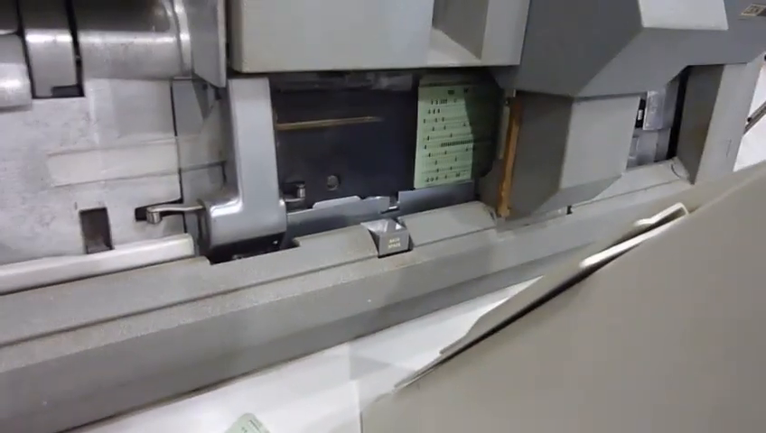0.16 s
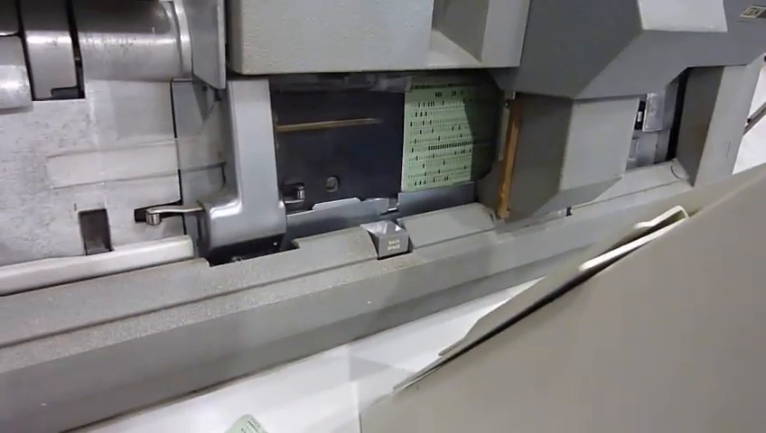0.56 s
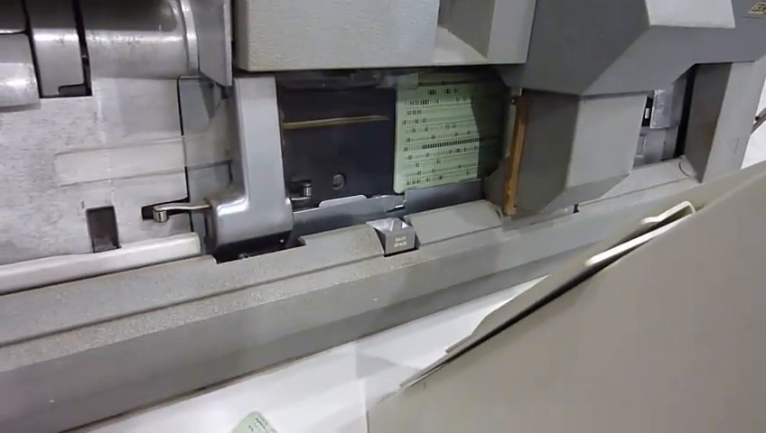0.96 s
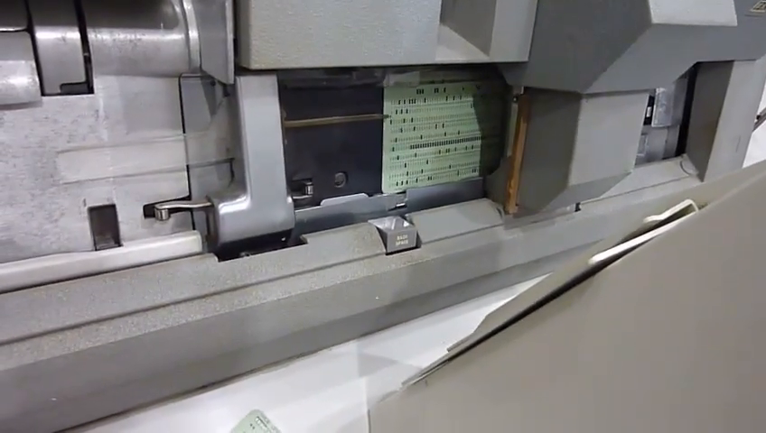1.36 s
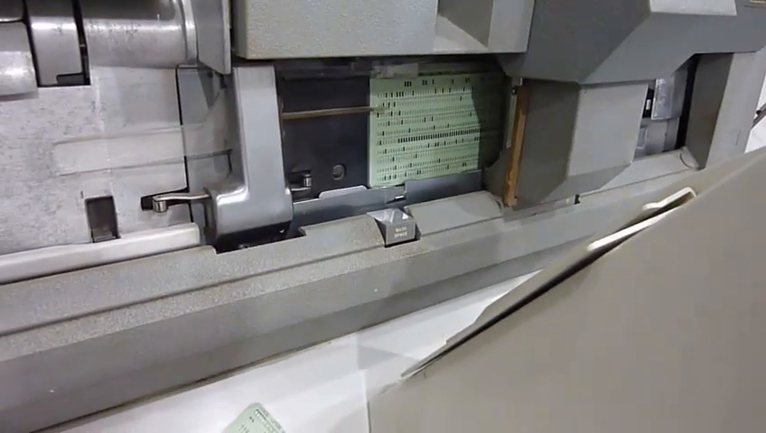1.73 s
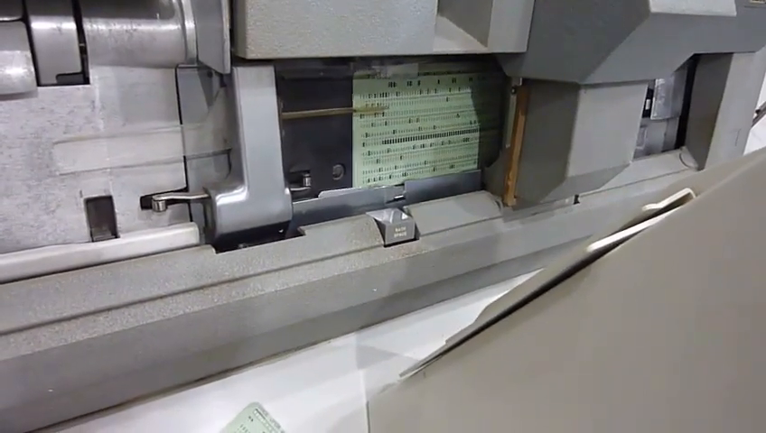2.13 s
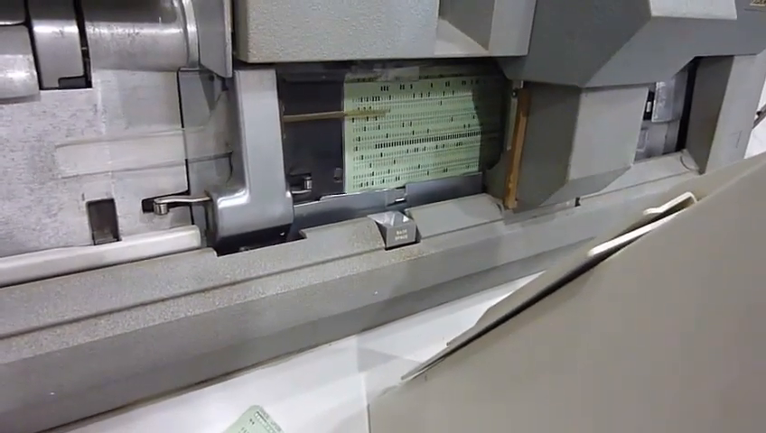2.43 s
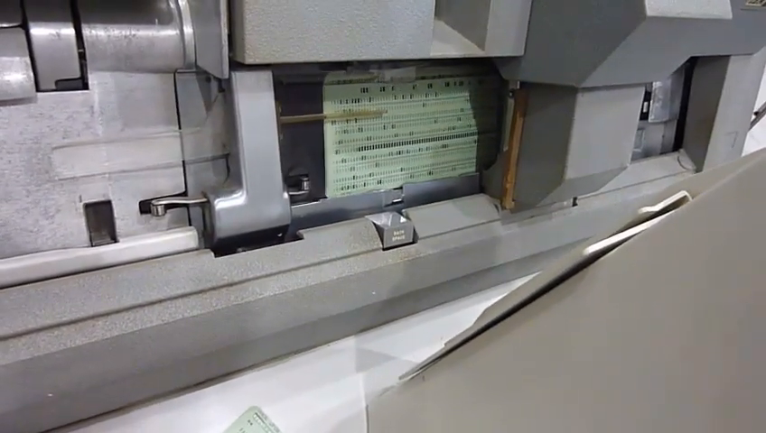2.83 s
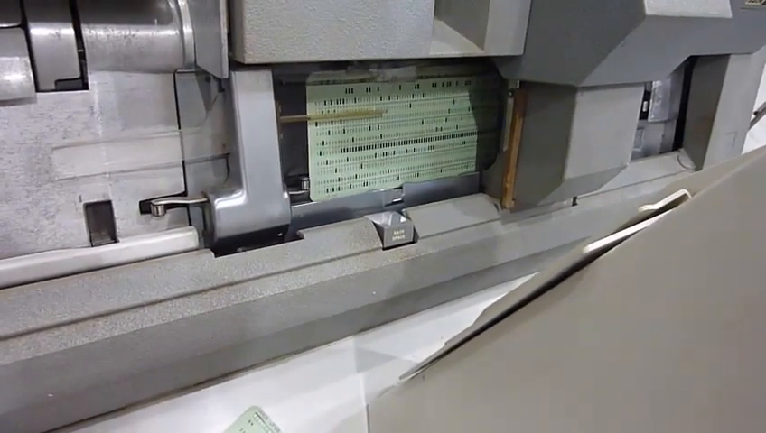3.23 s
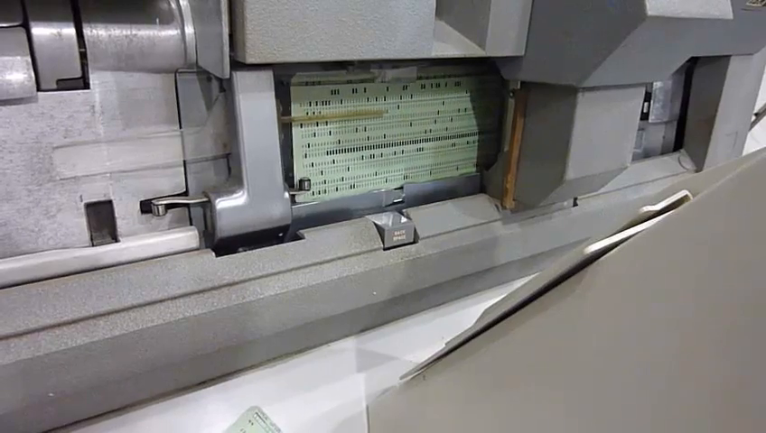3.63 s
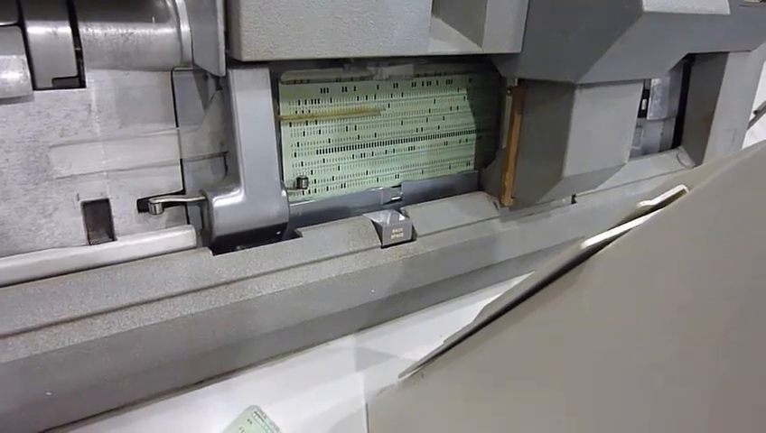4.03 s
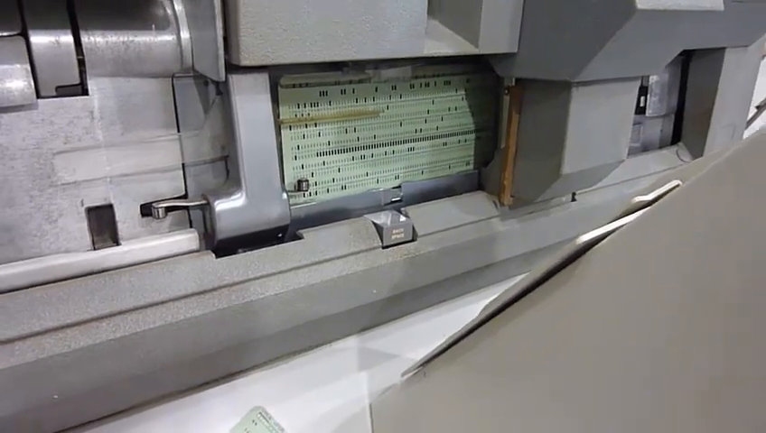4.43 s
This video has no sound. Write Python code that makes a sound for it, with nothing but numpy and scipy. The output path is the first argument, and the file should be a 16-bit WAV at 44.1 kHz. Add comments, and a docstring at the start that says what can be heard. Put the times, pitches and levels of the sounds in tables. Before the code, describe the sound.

A card punch is already running at the start, hammering about thirteen times a second with bright steel clacks, looser return clicks and a dense rattle. Just before four seconds it latches with a quick bouncing clack. The hard room rings out briefly and a soft motor whirr remains, with a faint belt whine and one small late tick. Close stereo pickup, slightly left, with limited treble.

```python
"""A keypunch, already running, duplicates a card at almost 13 columns a second. Each turn of its cam shaft trips
the interposers, drives the punches through the card, lets the linkage fall back and steps the card on with an
escapement: noise bursts through resonances, with decaying sines for levers and frame, over a noise rattle.
The clutch then latches, the hard room rings out as decaying noise, and the motor, heard throughout as
shaped noise and wavering sines, idles on: a belt whines once, the whirr grows a little and one late tick sounds."""
import sys
import numpy as np
from scipy import signal
from scipy.fft import rfft, irfft, next_fast_len
from scipy.io import wavfile
from scipy.ndimage import map_coordinates

SR = 44100
rng = np.random.default_rng(int(sys.argv[2]) if len(sys.argv) > 2 else 0)


def log_audio(samples):
    """Write samples as a 16-bit WAV file to the path given in sys.argv[1]."""
    # one column per channel
    frames = np.atleast_2d(samples).T
    # limit to full scale, then quantise
    limited = np.clip(frames, -1, 1)
    pcm = np.round(limited * 32767).astype(np.int16)
    wavfile.write(sys.argv[1], SR, pcm)


N = 202013

LEAD = SR // 2  # samples for which the machine has already been running
SPAN = N + LEAD
TIME = (np.arange(SPAN) - LEAD) / SR  # [s], zero where the audible part begins
AGE = np.arange(SR // 2) / SR  # time since the start of one sound [s]


def amp(db):
    """Level law: decibels to amplitude gain."""
    return 10 ** (np.asarray(db) / 20)


def unit(x):
    """Power normalization: scale to rms 1."""
    return x / np.sqrt(np.mean(x ** 2) + 1e-20)


def along(points, hz):
    """Logarithmic pitch scale: interpolate (frequency [Hz], value) points along it."""
    f, v = np.transpose(points)
    return np.interp(np.log(hz + 1), np.log(f), v)


def fade(t, t60):
    """Exponential damping: the amplitude falls by 60 dB in t60 seconds."""
    return np.exp(-np.log(1000) * t / t60)


def wobble(rate):
    """Slow random modulation: a smooth curve through rate random knots a second."""
    knots = rng.standard_normal(SR // 100)
    return map_coordinates(knots, [np.arange(SPAN) * rate / SR], mode="wrap")


def filtered(x, response):
    """Linear filtering: multiply the spectrum by a complex response of frequency."""
    m = next_fast_len(SPAN + SR // 4, True)
    gain = response(np.fft.rfftfreq(m, 1 / SR))
    return irfft(rfft(x, m) * gain, m)[..., :x.shape[-1]]


def resonance(f, hz, width):
    """Damped oscillator: a causal resonance with gain 1 at its centre."""
    return 1j * f * width / (hz * hz - f * f + 1j * f * width)


def add(track, s, sound):
    """Superposition: mix a sound into a track at time s."""
    start = max(int((s * SR) + LEAD), 0)
    stretch = track[..., start:][..., :sound.shape[-1]]
    stretch += sound[..., :stretch.shape[-1]]


def turns(count=49, lead_count=6):
    """Periodic drive: start [s] and three strengths [dB] of each turn, including those before time zero."""
    first_turn_s, turn_s = 0.0402, 0.077755  # steady shaft speed, one turn for each card column
    jitter_s = .0003  # play in the drive
    punch_scatter_db = 0.65  # the blow changes a little from column to column
    return_db, return_scatter_db = -1, 2  # the linkage falls back loosely
    escape_db, escape_scatter_db = 1.37, 0.5  # the tooth catches more or less firmly
    column = np.arange(-lead_count, count)
    late, punch, fall, step = rng.standard_normal((len(column), 4)).T
    starts = first_turn_s + turn_s * column + jitter_s * late
    return (starts, punch_scatter_db * punch,
            return_db + return_scatter_db * fall, escape_db + escape_scatter_db * step)


def contacts(parts, times, strengths_db, alike=0, jitter=0):
    """Impact excitation: steel on steel chatters in the part's resonance, partly alike each turn (mid, side)."""
    out, t, alike = np.zeros((2, SPAN)), AGE[:SR // 12], np.clip(alike, 0, 1)
    bite = 1 - fade(t, 0.00077)  # the parts take a moment to seat
    for delay, db, hz, width, t60 in parts:
        track = np.zeros((2, SPAN))
        habit = rng.standard_normal((2, len(t)))  # the share that repeats at every turn
        envelope = amp(db) * bite * fade(t, t60)
        for s, strength_db in zip(times, strengths_db):
            fresh = rng.standard_normal(habit.shape)
            chatter = np.sqrt(alike) * habit + np.sqrt(1 - alike) * fresh
            add(track, s + delay + jitter * rng.normal(), amp(strength_db) * envelope * chatter)
        ringing = signal.lfilter(*signal.iirpeak(hz, hz / width, SR), track)
        out += ringing * np.sqrt(SR / np.pi / width)  # makes up for the noise power a narrow band loses
    return out


def clatter(s, punch_db, return_db, escape_db):
    """Resonant coloration: small steel parts ring along with the bright contacts and the rattle."""
    # contacts of the interposers and punches, the falling linkage and the escapement in one turn:
    # (delay [s], relative level [dB], resonance [Hz], bandwidth [Hz], t60 of the burst [s])
    punch_parts = [(-.0065, -7, 4700, 1003, 0.33), (-.003, -3.5, 5870, 416, 0.18),
                   (-.0035, -6.5, 3920, 2370, 0.05), (.0002, -0.5, 1404, 715, 0.011),
                   (.0018, -0.5, 3030, 4000, 0.031), (.0035, -7, 3560, 790, 0.068),
                   (.0045, 2, 1240, 700, 0.0022), (.0052, 3, 5370, 4100, 0.026),
                   (.0085, -2.5, 2330, 1696, 0.038)]
    return_parts = [(.0125, -7.5, 1190, 948, 0.1), (.0165, -3.5, 2340, 2380, 0.031),
                    (.0145, -6.5, 6060, 2950, 0.26), (.02, -10.5, 1374, 483, 0.051),
                    (.0355, -8.5, 2290, 933, 0.015), (.037, -11.5, 1054, 472, 0.093)]
    escape_parts = [(.0502, -2, 3390, 490, 0.036), (.0505, -7, 1700, 296, 0.0099),
                    (.052, -6, 6530, 370, 0.065), (.054, -6.5, 2690, 890, 0.035),
                    (.0545, -8, 820, 680, 0.02), (0.055, -8.5, 1580, 1346, 0.04)]
    # the clutch latches with a bounce and later ticks once:
    # (time [s], relative level [dB], resonance [Hz], bandwidth [Hz], t60 of the burst [s])
    stop_parts = [(3.8395, -2.5, 3700, 4600, 0.027), (3.8455, -1, 3400, 4000, 0.036),
                  (3.843, -7.5, 770, 900, 0.03), (4.463, -22, 4000, 5000, 0.026)]
    # small steel parts that ring along: (frequency [Hz], bandwidth [Hz], gain [dB])
    steel = [(1184, 49, -10.5), (1380, 110, -3.5), (1604, 53, -11), (1950, 20, -8.5), (2190, 54, -5),
             (2823, 88, -4.5), (3040, 34, -6), (4080, 30, -2), (4800, 74, 2.5), (5680, 94, -7.5),
             (7120, 120, -4)]
    hits = contacts(punch_parts, s, punch_db, alike=0.21, jitter=.0003)
    hits += contacts(return_parts, s, return_db, alike=.3, jitter=.0004)
    hits += contacts(escape_parts, s[:-1], escape_db[:-1], jitter=.0002)  # no step after the last column
    hits += contacts(stop_parts, [0], [0])
    metal = amp(-22.0) * hits + amp(-34.0) * rattle(s[-1] + 0.018)

    def steel_response(f):
        return 1 + sum(amp(db) * resonance(f, hz, width) for hz, width, db in steel)

    return filtered(metal, steel_response)


def thumps(times, strengths_db, blow_delay, scatter_db, jitter):
    """Modal vibration: levers knock and the punch blow rings the frame; small panels radiate little bass."""
    # dull knocks of the heavy levers in each turn:
    # (delay [s], relative level [dB], frequency [Hz], t60 [s])
    knocks = [(-.0005, -22, 880, 0.015), (.005, -10.5, 1040, 0.0068), (.0058, -12.5, 747, 0.0076),
              (.0012, -28.5, 336, 0.021), (.0075, -20, 362.3, 0.046), (.0185, -22, 730, 0.018),
              (.0283, -19, 577, 0.013), (0.0287, -25, 315, 0.032), (.036, -25, 346, 0.022),
              (0.0577, -22.5, 354, .018)]
    # modes of the frame and its covers: (frequency [Hz], relative level [dB], t60 [s])
    frame = [(308, -31.5, 0.43), (361.7, -34.5, 0.39), (446, -35.5, 0.33), (573.1, -35.5, 0.35),
             (602.5, -33.5, 0.2), (717, -38, 0.28), (805, -42.5, 0.5)]
    out = np.zeros(SPAN)

    def ring(db, hz, t60):
        level = amp(db + scatter_db * rng.normal())
        return level * np.sin(2 * np.pi * hz * AGE) * fade(AGE, t60)

    soft_contact = 1 - fade(AGE, .005)
    for s, punch_db in zip(times, strengths_db):
        for delay, db, hz, t60 in knocks:
            add(out, s + delay + jitter * rng.normal(), ring(db + punch_db, hz, t60) * soft_contact)
        for hz, db, t60 in frame:
            add(out, s + blow_delay, ring(db + punch_db, hz, t60))
    return filtered(out, lambda f: f ** 4 / (f ** 4 + 150 ** 4))


def rattle(end):
    """Random excitation: cams and loose links chatter until the time end, then die away."""
    # spectrum of the running linkage: (frequency [Hz], relative density level [dB per Hz])
    spectrum = [(35, -29.5), (100, -6.5), (200, -2.5), (280, 15.5), (450, 0), (700, 7), (1400, 1),
                (1900, 0.5), (3000, -0.5), (4400, -1.5), (7300, -31)]
    running = fade(np.maximum(TIME - end, 0), 0.086)
    noise = rng.standard_normal((2, SPAN))
    chatter = unit(filtered(noise, lambda f: amp(along(spectrum, f))))
    return running * chatter * amp(0.87 * wobble(37))


def motor():
    """Rotating machinery: broadband whirr of belts and bearings, wavering tones, and a few that swell and sink."""
    # whirr of the idling drive: (frequency [Hz], relative density level [dB per Hz])
    whirr_spectrum = [(60, -54), (130, -17), (180, -20.5), (245, -2), (390, -16), (600, -13), (720, -11.5),
                      (950, -16), (1500, -19.5), (2100, -26), (3100, -20.5), (4200, -31), (4850, -17.5),
                      (5300, -23.5), (7200, -32.5)]
    # motor and belt tones: (frequency [Hz], relative level [dB])
    whine = [(243, -54), (269, -49.5), (463, -60), (595, -53.5), (705, -56), (1367, -59.5), (1610, -60)]
    # tones of the belt that whines softly once: (frequency [Hz], relative level at the peak [dB])
    swell = [(587, -43), (705, -48), (790, -56)]
    whirr_db, rise_db = -47, 4  # the drive grows a little louder after the stop
    rise_s, rise_length_s = 4.23, .08
    swell_s, swell_width_s = 4.335, 0.088
    waver_db = 2.5
    noise = rng.standard_normal((2, SPAN))
    whirr = unit(filtered(noise, lambda f: amp(along(whirr_spectrum, f))))
    rise = .5 + .5 * np.tanh((TIME - rise_s) / rise_length_s)
    out = amp(whirr_db + rise_db * rise + 0.55 * wobble(30)) * whirr

    def tone(hz, db):
        level = amp(db + waver_db * wobble(9.4))
        return level * np.sin(2 * np.pi * hz * TIME + 1.52 * wobble(17))  # phase wavers too

    swelling = np.exp(-((TIME - swell_s) / swell_width_s) ** 2)
    out[0] += sum(tone(hz, db) for hz, db in whine)
    out[0] += sum(tone(hz, db) for hz, db in swell) * swelling
    return out


def room(x):
    """Diffuse reverberation: in a hard-walled room each frequency dies at its own speed (mid, side)."""
    # reverberation time: (frequency [Hz], t60 [s])
    decay = [(200, 1), (400, 0.61), (1000, 0.98), (3000, 0.98), (7000, 0.91)]
    # strength of the reverberation: (frequency [Hz], relative level [dB])
    wet = [(200, -8), (450, -11), (800, -4.5), (1300, -4.5), (3000, -6), (7000, -1)]
    hz, t, z = signal.stft(rng.standard_normal((2, SR)), SR, nperseg=256)
    shape = fade(t, along(decay, hz)[:, None])
    # equal energy in every band before the level is set
    shape *= amp(along(wet, hz))[:, None] / np.sqrt(SR * np.mean(shape ** 2, axis=1, keepdims=True))
    tail = signal.istft(z * shape, SR, nperseg=256)[1]
    first_wall = SR // 150  # delay of the first reflection [samples]
    return signal.fftconvolve(np.pad(x, (first_wall, 0))[None], tail, axes=1)[:, :SPAN]


def scene():
    """Mid-side stereophony: the machine stands close and a little to the left."""
    # stereo width: (frequency [Hz], gain of the side signal [dB])
    side_gain = [(100, -27), (300, -25), (900, -15.5), (1600, -12), (2700, -9), (4700, -7), (7300, -7.5)]
    s, punch_db, return_db, escape_db = turns()
    machine = clatter(s, punch_db, return_db, escape_db)
    machine[0] += thumps(s, punch_db, blow_delay=0.00314, scatter_db=2.0, jitter=.0001)
    mid, side = machine + room(machine[0]) + motor()
    side = filtered(side, lambda f: amp(along(side_gain, f)))
    balance_db = [[.75], [-.75]]  # left, right
    return np.array([mid + side, mid - side])[:, LEAD:] * amp(balance_db)


def record(dry):
    """Band limitation: an uneven response, one deep notch, a steep upper edge and a faint narrow band near 8.8 kHz."""
    # tone balance of the small pickup: (frequency [Hz], gain [dB])
    mic = [(30, 9.5), (120, -10.5), (190, -8.5), (260, -2), (500, 5), (1000, 2.5), (1600, 5), (1850, 2),
           (2200, 4), (3500, 2), (4400, -1.5), (5000, -1.5), (6200, -4.5), (7200, 2)]
    notch_hz, edge_hz, top_hz = 5450, 7310, 9050

    def response(f):
        notch = (f - notch_hz) ** 2 / ((f - notch_hz) ** 2 + 140 ** 2)
        edge = 1 / np.sqrt(1 + (f / edge_hz) ** 400)
        faint_band = np.exp(-((f - 8830) / 130) ** 2) * (f < top_hz)
        return amp(along(mic, f)) * notch * (edge + amp(-19) * faint_band)

    return filtered(dry, response)


dry = scene()
out = record(dry)
log_audio(out)
```